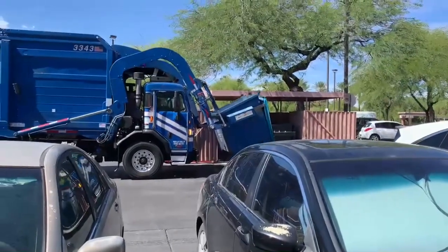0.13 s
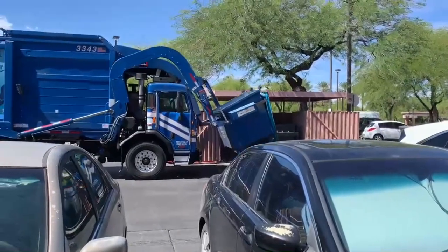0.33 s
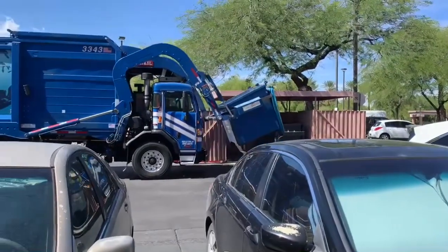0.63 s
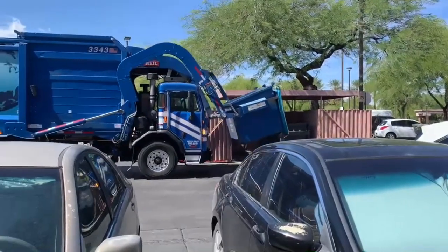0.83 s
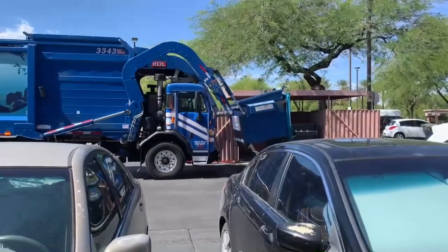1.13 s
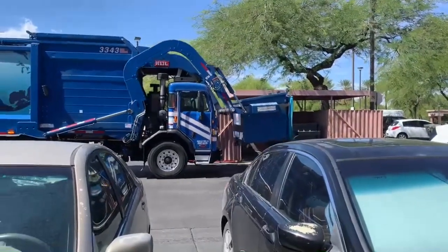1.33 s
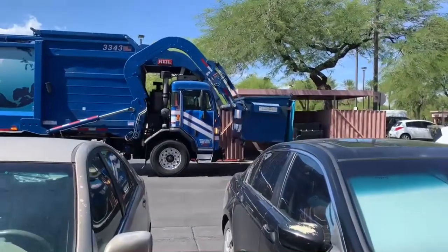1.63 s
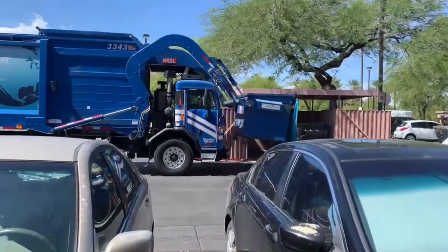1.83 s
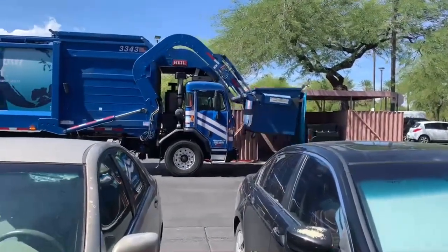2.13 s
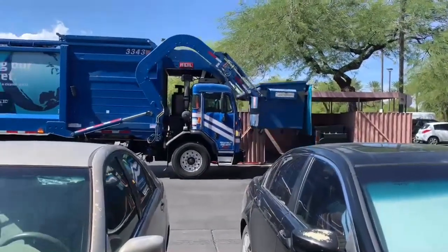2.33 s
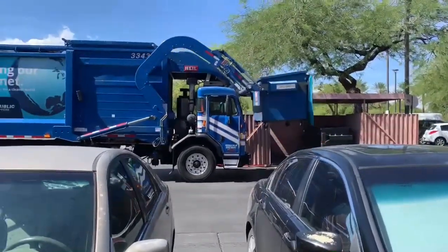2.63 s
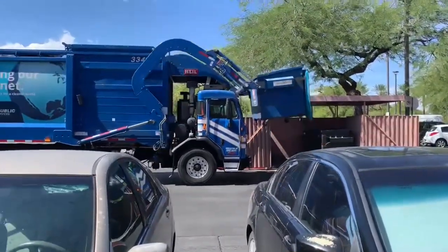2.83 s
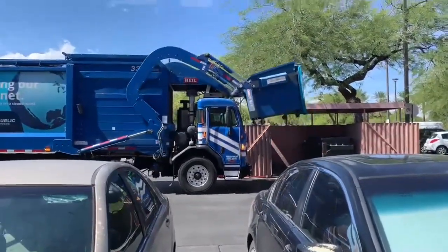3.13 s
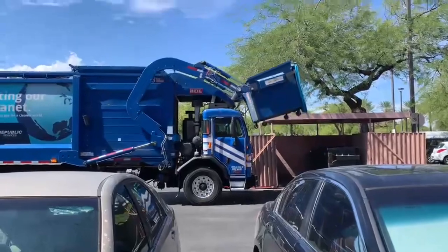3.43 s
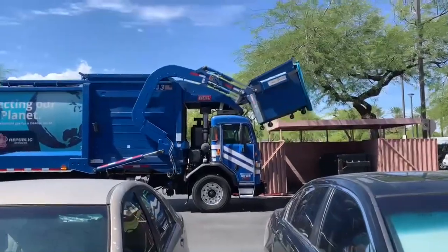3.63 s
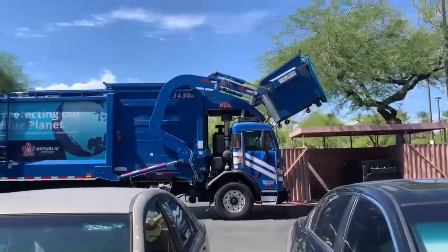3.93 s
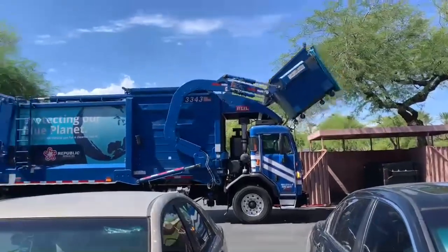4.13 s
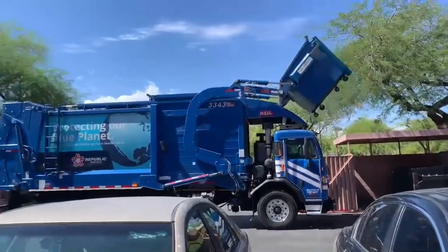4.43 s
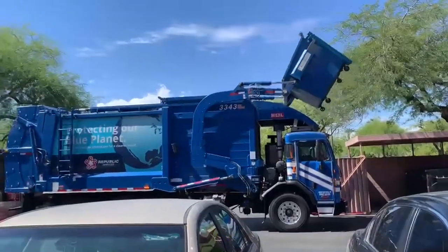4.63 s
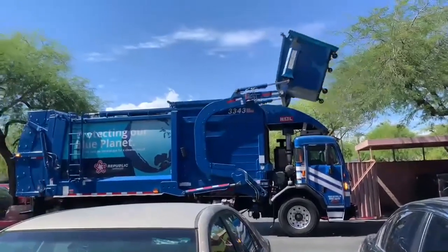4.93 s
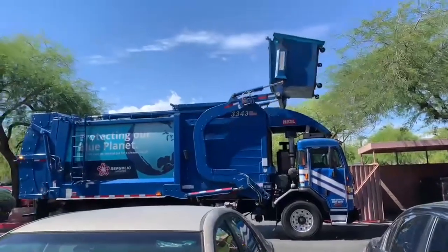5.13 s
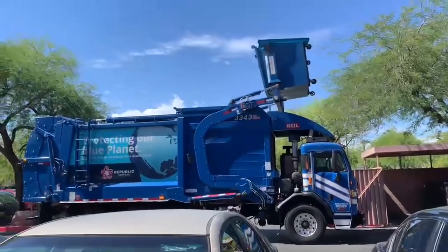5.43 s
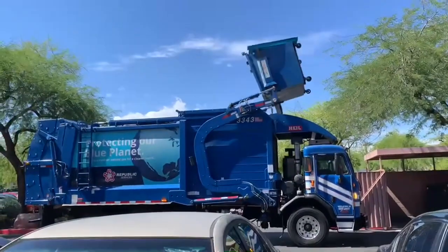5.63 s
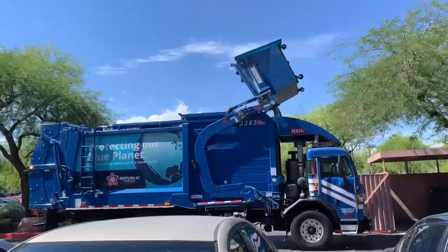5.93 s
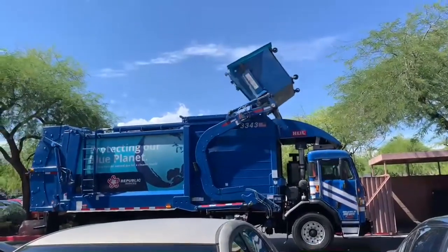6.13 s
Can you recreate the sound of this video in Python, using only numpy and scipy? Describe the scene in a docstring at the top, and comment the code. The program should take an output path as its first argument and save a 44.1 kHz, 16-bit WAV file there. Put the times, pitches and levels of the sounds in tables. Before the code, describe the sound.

Rumbling, clattering garbage truck engine with wavering pump whine and oil hiss lifts a steel bin, ending in loud booming bangs.

```python
"""A front-loading garbage truck, heard across a parking lot, hoists a steel container over its cab.
Its six-cylinder diesel revs up three times: a firing-rate drone, coloured noise and short knocks follow the crank.
The pump and gears whine as wavering tones at multiples of crank speed; oil hisses as narrow noise bands.
The pivots squeak as jittery gliding tones; the container booms, clanks, rattles and rings on the forks.
At the top its load starts to crash out in dull, damped thuds; two slightly unlike microphones take it in."""
import sys
import numpy as np
from scipy import signal
from scipy.fft import rfft, irfft
from scipy.io import wavfile
from scipy.ndimage import uniform_filter1d, map_coordinates

SR = 44100
rng = np.random.default_rng(int(sys.argv[2]) if len(sys.argv) > 2 else 0)


def inscribe(sig):
    """Save sig as 16-bit PCM at rate SR to the path in sys.argv[1].

    A 1-D sig is mono; a 2-D sig holds one channel per row.
    Samples are clipped to [-1, 1] before scaling.
    """
    pcm = np.round(np.clip(np.atleast_2d(sig).T, -1, 1) * 32767)
    wavfile.write(sys.argv[1], SR, pcm.astype(np.int16))


N = 277124
T = np.arange(N) / SR  # seconds
HZ = np.fft.rfftfreq(N, 1 / SR)


def amp(db):
    """Decibels to gain."""
    return 10 ** (np.asarray(db) / 20)


def unit(x):
    """Scales to rms 1."""
    return x / np.sqrt(np.mean(x ** 2) + 1e-20)


def curve(rows, axis=1):
    """One column of a timed table at every sample."""
    rows = np.array(rows)
    return np.interp(T, rows[:, 0], rows[:, axis])


def hump(peak_s, width_s):
    """A smooth bell in time, 1 at its peak."""
    return np.exp(-((T - peak_s) / width_s) ** 2)


def colour(points):
    """A table over frequency, joined on a log axis."""
    hz, value = np.transpose(points)
    return np.interp(np.log(HZ + 1), np.log(hz + 1), value)


def wander(hz):
    """Slow random movement of rms 1, mostly slower than hz."""
    spectrum = rfft(rng.standard_normal(N)) * np.exp(-(HZ / hz) ** 2)
    return unit(irfft(spectrum, N))


# likeness of the truck's noise at the two ears: frequency_hz, likeness (0-1)
EAR_LIKENESS = [(40, 0.93), (300, 0.89), (550, 0.74), (780, 0.27), (1150, 0.8), (1600, 0.47), (2600, 0.5),
                (3400, 0.46), (4300, 0.94), (5700, 0), (6600, 0.78), (8300, 1), (10000, 0.86), (12000, 0.6),
                (13500, 1), (16000, 1)]


def noise(spectrum):
    """Coloured noise at two ears, alike to a degree that differs by frequency."""
    same = np.clip(colour(EAR_LIKENESS), 0, 1)
    mid, side = rfft(rng.standard_normal((2, N))) * amp(colour(spectrum))
    mid = irfft(mid * np.sqrt(1 + same), N)
    side = irfft(side * np.sqrt(1 - same), N)
    return np.array([mid + side, mid - side]) / mid.std()


def fuzzy_tone(hz, width_hz):
    """A narrow band of noise around a pitch that may move."""
    angle = 2 * np.pi * np.cumsum(hz * np.ones(N)) / SR
    return unit(wander(width_hz) * np.cos(angle) + wander(width_hz) * np.sin(angle))


def reflections(x, depth_db, spacing_hz):
    """Echoes from the ground and the parked cars comb the sound; the comb shifts as the listener walks."""
    hz, t, z = signal.stft(x, SR, nperseg=2048)
    comb = rng.standard_normal(z.shape[1:])
    comb = uniform_filter1d(comb, max(1, round(spacing_hz / hz[1])), axis=0)
    comb = unit(uniform_filter1d(comb, size=30, axis=1))
    comb = comb * np.minimum(hz / 800, 1)[:, None]  # shallower in the lows
    return signal.istft(z * amp(depth_db * comb), SR, nperseg=2048)[1][:, :N]


# engine speed: start_s, speed_rpm
ENGINE_SPEED = [(0.0, 1318), (0.8, 1413), (1.25, 1436), (1.55, 1426), (2.0, 1339), (2.35, 1238),
                (2.58, 1237), (2.8, 1305), (3.7, 1429), (4.85, 1430), (5.0, 1401), (5.2, 1270),
                (5.38, 1210), (5.6, 1242), (5.97, 1416), (6.28, 1425)]


def crank():
    """The crank's speed (rpm) and the turns it has made, which pace engine, pump and gears."""
    rpm = curve(ENGINE_SPEED)
    return rpm, np.cumsum(rpm) / 60 / SR


# spectrum of the engine's clatter, also of its knocks: frequency_hz, level_db (per Hz)
CLATTER_SPECTRUM = [(400, -21), (720, -8.5), (880, -0.5), (1360, 0.8), (1560, -7.5), (1850, -5),
                    (2250, -7.8), (2620, -5.8), (3300, -13), (4200, -12.3), (5300, -19.5), (6900, -22.5),
                    (9000, -39), (12000, -59)]
KNOCK_DECAY_S, KNOCK_SPREAD_DB, KNOCK_DRIFT_S = .013, 1.3, .00016


def knocks(firing):
    """Combustion knock: at each firing a cylinder rings the block in its own way, unevenly; rms 1."""
    at = np.flatnonzero(np.diff(firing.astype(int)))
    size = amp(KNOCK_SPREAD_DB * rng.standard_normal(len(at)))
    drift = (KNOCK_DRIFT_S * SR * wander(7)[at]).astype(int)
    at = np.clip(at + drift, 0, N - 1)
    age, out = T[:SR // 25], np.zeros((2, N))
    rings = noise(CLATTER_SPECTRUM)[:, :6 * len(age)].reshape(2, 6, -1)
    rings = rings * np.exp(-age / KNOCK_DECAY_S)
    for cylinder in range(6):
        train = np.zeros((1, N))
        train[0, at[cylinder::6]] = size[cylinder::6]
        out += signal.oaconvolve(train, rings[:, cylinder], axes=1)[:, :N]
    return unit(out)


# spectrum of the engine's low roar: frequency_hz, level_db (per Hz)
ROAR_SPECTRUM = [(40, -34), (62, -1), (85, -8.5), (120, -3.5), (145, -8.5), (170, 0.5), (215, 0.5),
                 (300, -1), (400, -4), (570, -6), (660, -11.5), (760, -19.5), (1000, -17), (2000, -82)]
# clatter from further along the truck, where the ground echo no longer hollows it:
# frequency_hz, level_db (per Hz)
OPEN_CLATTER_SPECTRUM = [(400, -11), (740, -2), (960, 0.5), (1330, -1.5), (1560, -4.5), (1850, -2.5),
                         (2250, -7.5), (2620, -7), (3300, -10.5), (4200, -12.5), (5300, -18.5), (6900, -22),
                         (9000, -37), (12000, -59)]
OPEN_S, OPEN_TAKES_S = 4.02, 0.52  # when the listener gets there, and how gradually
# harder note that the engine takes on under load: frequency_hz, level_db (per Hz)
STRAIN_SPECTRUM = [(250, -18), (380, -1), (480, 0), (600, -5), (740, -9), (950, -15), (1300, -22),
                   (2000, -42)]
STRAIN_DB, STRAIN_S, STRAIN_WIDTH_S = -28.5, 4.52, 0.75
# treble hiss of the fan: frequency_hz, level_db (per Hz)
FAN_SPECTRUM = [(2000, -2.5), (5000, -9), (6500, -0.5), (8300, 1.5), (10000, 0), (11700, -4), (13500, -6.5),
                (16000, -16)]
# levels at working speed, and their growth with speed
WORKING_RPM = 1400
DRONE_DB, DRONE_DB_PER_RPM = -39.5, 0.07
ROAR_DB, ROAR_DB_PER_RPM = -21, 0.0029
CLATTER_DB, KNOCK_DB, CLATTER_DB_PER_RPM = -29, -34, 0.0081
FAN_DB, FAN_DB_PER_RPM = -40.5, 0.0088
# the heaviest part of the lift, as the arms swing the container over the cab
HEAVE_S, HEAVE_WIDTH_S = 4.295, 0.37
HEAVE_ROAR_DB, HEAVE_CLATTER_DB, HEAVE_DRONE_DB = 2.1, 1.35, 16.5
CLATTER_PEAK_S, CLATTER_WIDTH_S = 3.92, 0.47  # the clatter swells a little earlier
DRONE_WIDTH_S, DRONE_WAVER_DB, DRONE_WAVER_HZ = 0.63, 0.5, 11  # slow, uneven swell
SHADE_DB, SHADE_S = -3, 0.49  # at first the parked cars screen off some of the treble


def engine(turns, rpm):
    """Three firings a turn drive drone, roar, clatter and fan with speed; strain swells under load."""
    firing, revs = 3 * turns, rpm - WORKING_RPM

    exhaust = np.sqrt(2) * (np.sin(2 * np.pi * firing) + 0.018 * np.sin(4 * np.pi * firing))
    drone_db = DRONE_DB + DRONE_DB_PER_RPM * revs
    drone_db = drone_db + HEAVE_DRONE_DB * hump(HEAVE_S, DRONE_WIDTH_S)
    drone_db = drone_db + DRONE_WAVER_DB * wander(DRONE_WAVER_HZ)
    drone = amp(drone_db) * exhaust

    roar_db = ROAR_DB + ROAR_DB_PER_RPM * revs
    roar_db = roar_db + HEAVE_ROAR_DB * hump(HEAVE_S, HEAVE_WIDTH_S) + .5 * wander(23)
    roar = amp(roar_db) * noise(ROAR_SPECTRUM)

    # equal-power crossfade from the hollow clatter to the open one
    opening = np.pi / 4 * (1 + np.tanh((T - OPEN_S) / OPEN_TAKES_S))
    hollow = np.cos(opening) * noise(CLATTER_SPECTRUM)
    open_clatter = np.sin(opening) * noise(OPEN_CLATTER_SPECTRUM)
    metal = amp(CLATTER_DB) * (hollow + open_clatter) + amp(KNOCK_DB) * knocks(firing)
    clatter_db = CLATTER_DB_PER_RPM * revs + 0.6 * wander(13.0)
    clatter_db = clatter_db + HEAVE_CLATTER_DB * hump(CLATTER_PEAK_S, CLATTER_WIDTH_S)
    clatter = amp(clatter_db) * metal

    strain = amp(STRAIN_DB) * hump(STRAIN_S, STRAIN_WIDTH_S) * noise(STRAIN_SPECTRUM)
    fan = amp(FAN_DB + FAN_DB_PER_RPM * revs) * noise(FAN_SPECTRUM)
    treble = amp(SHADE_DB * hump(0, SHADE_S)) * (clatter + fan)
    return drone + reflections(roar + strain + treble, depth_db=2.69, spacing_hz=65)


# pressure in the lift circuit, heard as the level of the pump's whine: start_s, level_db
LIFT_PRESSURE = [(0, -34), (.08, -37), (.2, -27.5), (.52, -20), (.62, -26), (.75, -22), (.95, -29),
                 (1.07, -19), (1.22, -26.5), (1.4, -26), (1.53, -17.5), (1.74, -27.5), (1.92, -18.5),
                 (2.04, -20), (2.12, -29), (2.7, -29.5), (2.9, -23.5), (3.1, -24), (3.28, -19), (3.46, -35),
                 (3.56, -19.5), (3.69, -18.5), (3.84, -26.5), (3.93, -19.5), (4.2, -23.5), (4.7, -21),
                 (4.82, -20.5), (5.12, -22.5), (5.24, -33), (5.6, -28.5), (5.88, -25), (6.0, -22.5),
                 (6.14, -26), (6.28, -25)]
PUMP_WAVER_DB, PUMP_WAVER_HZ = 0.3, 14  # the whine wavers as the load sways
# tones of engine and pump: crank_multiple, level_db (against the pump), flutter (share)
CRANK_TONES = [(12.5, 0, .12), (12.2, -10, 1), (25.0, -21, 1), (50.6, -25, .7), (80.2, -32, 1)]
# hiss of oil rushing through the lift valve: start_s, level_db, centre_hz
OIL_HISS = [(0, -44.5, 3910), (1.0, -43, 4020), (1.8, -45, 3980), (2.5, -45.5, 3950), (3.0, -43, 3990),
            (3.5, -45.5, 4380), (4.2, -45, 4690), (4.8, -49, 4650), (5.3, -61, 4140), (6.28, -62, 4370)]
OIL_WIDTH_HZ = 340


def hydraulics(turns):
    """The pump's ripple and side tones follow the crank; oil hisses in a band of moving pitch and level."""
    out = np.zeros((2, N))
    pressure_db = curve(LIFT_PRESSURE) + PUMP_WAVER_DB * wander(PUMP_WAVER_HZ)
    for multiple, db, flutter in CRANK_TONES:
        waver = 1 + flutter * (wander(10.0) + 1j * wander(19.0))
        scatter = np.array([wander(29) + 1j * wander(9.2) for ear in range(2)])
        scatter = scatter * min(0.019 * multiple, 1)  # higher tones differ more between the ears
        tone = ((waver + scatter) * np.exp(2j * np.pi * multiple * turns)).real
        out += amp(pressure_db + db) * unit(tone)
    centre_hz = curve(OIL_HISS, axis=2)
    shared, left, right = (fuzzy_tone(centre_hz, width_hz=OIL_WIDTH_HZ) for path in range(3))
    return out + amp(curve(OIL_HISS)) * unit(shared + 1.3 * np.array([left, right]))


GEARS_DB = -23.5  # against the lift pressure


def gears(turns):
    """The mesh tone follows crank and pressure, fading differently at each ear as the echoes shift."""
    fade = np.array([1 + .7 * (wander(14) + 1j * wander(14)) for ear in range(2)])
    mesh = unit((fade * np.exp(2j * np.pi * 76.6 * turns)).real)  # 76.6 cycles a crank turn
    return amp(curve(LIFT_PRESSURE) + GEARS_DB) * mesh


# jolts to the body and the hanging container: start_s, hold_s, level_db, fade_db_per_s
BODY_JOLTS = [(0, .1, -32, 22), (.64, 0.5, -24.5, 70), (1.42, 0.09, -32, 28), (2.08, .25, -28.5, 22),
              (3.9, .4, -31.5, 12), (6.105, .07, -19.5, 70), (6.24, .1, -16.5, 30)]
# low spectrum of the shaking body: frequency_hz, level_db (per Hz)
BODY_SPECTRUM = [(15, -26), (30, -22), (42, -10), (52, 4.5), (62, -7), (90, -1), (130, -9.5), (180, -36),
                 (300, -48)]
JOLT_RISE_S, SHUDDER_REST_DB = 0.025, -36.5


def shudder():
    """Each jolt shakes the heavy body for a while, then dies away."""
    power = amp(SHUDDER_REST_DB) ** 2
    for s, hold, db, fade in BODY_JOLTS:
        rise = np.clip((T - s) / JOLT_RISE_S, 0, 1)
        power = power + (rise * amp(db - fade * np.maximum(T - s - hold, 0))) ** 2
    return np.sqrt(power) * noise(BODY_SPECTRUM)


# squeaks of the arm pivots:
# start_s, length_s, pitch_hz, fundamental_db, octave_db, jitter (rms share of pitch)
PIVOT_SQUEAKS = [(.62, .17, 2700, -39, -39, .12), (.671, .009, 5300, -30, -37, .01),
                 (2.097, .026, 2570, -28, -40, .01), (2.12, .14, 2660, -52, -45, .05),
                 (2.31, .045, 2720, -44, -38, .07), (2.369, .026, 5300, -41, -33, .06),
                 (2.38, .035, 2600, -46, -42, .025), (3.15, .09, 3600, -55, -47, .06),
                 (3.29, .08, 4100, -55, -47, .06), (5.87, .035, 4000, -52, -41, .04),
                 (6.16, .09, 2640, -39, -34, .03)]


def pivots():
    """Dry pins slip in short, rough squeaks with a strong octave."""
    out = np.zeros((2, N))
    for s, length, hz, first_db, octave_db, jitter in PIVOT_SQUEAKS:
        near = (T > s) & (T < s + length)
        age = T[near] - s
        slip = unit(uniform_filter1d(rng.standard_normal((2, len(age))), size=60))
        angle = 2 * np.pi * np.cumsum(hz * (1 + jitter * slip), axis=1) / SR
        tone = amp(first_db) * np.sin(angle) + amp(octave_db) * np.sin(2 * angle)
        out[:, near] += np.sin(np.pi * age / length) * tone
    return out


# ringing of loose steel lids and hinges: pitch_hz, level_db (relative), t60_s
LOOSE_HINGES = [(1370, -11, .1), (1940, -12, 0.087), (2580, -2, 0.08), (4360, 0, 0.065), (5230, 1, 0.059),
                (5830, -10, .08), (6480, -3, 0.054), (7100, -2, 0.05), (10100, -4, 0.032),
                (11200, 1.5, 0.027)]


def rattle(per_s, spread_db):
    """A shower of small, uneven taps, each ringing one mode of the loose hardware; rms 1."""
    out, age = np.zeros((2, N)), T[:SR // 8]
    for hz, db, t60 in LOOSE_HINGES:
        struck = rng.random(N) < per_s / SR
        taps = struck * amp(spread_db * np.minimum(rng.exponential(1, N), 3))
        ring = amp(db - 60 * age / t60) * np.sin(2 * np.pi * (hz * age + rng.random((2, 1))))
        out += signal.oaconvolve(taps[None], ring, axes=1)[:, :N]
    return unit(out)


# blows on the container, levels and decays before the trims in the function:
# start_s, boom_db, clank_db, rattle_db (loose hardware), decay_s
CONTAINER_BLOWS = [(0.672, -21, -45, -32, 0.13), (.69, -32, -38, -39, .2), (0.715, -24, -24.5, -46, 0.18),
                   (0.741, -29, -36, -45, 0.19), (2.318, -37, -42, -38, .14), (2.373, -30, -29, -36, 0.15),
                   (3.946, -44, -40, -33, .1), (6.102, -12, -18, -26.5, 0.2),
                   (6.129, -17.5, -30, -36, 0.68), (6.145, -15.5, -40, -44, 0.43),
                   (6.18, -15.5, -33, -35, 0.19), (6.204, -23, -26, -42, 0.19), (6.231, -23, -35, -41, .2),
                   (6.26, -16, -40, -39, 0.35)]
# ringing of the container's panels: pitch_hz, level_db (relative), t60_s
PANEL_RINGS = [(65.7, -19, 0.43), (230, -22, .4), (273, -12, 0.15), (339, -11, 0.45), (408, -1, 0.92),
               (508, 8, 0.33), (573, -8, 0.27), (594, -10, 0.75), (670, -15, 0.73), (862, -3, 0.49),
               (914, -20, 0.38), (1080, -16, 0.33), (1970, -8, 0.26)]
# boom of the steel walls: frequency_hz, level_db (per Hz)
BOOM_SPECTRUM = [(40, -25), (70, -17), (130, 3), (230, 1.5), (380, 10.5), (460, -5.5), (620, 0), (900, -9),
                 (1400, -26), (2600, -21), (4200, -26.5), (6800, -25), (11000, -66), (16000, -48)]
# steel edges striking: frequency_hz, level_db (per Hz)
EDGE_SPECTRUM = [(400, -18), (900, 5.5), (1400, -4), (2000, 1), (3000, -12), (4300, -7), (7000, -19),
                 (11000, -29), (16000, -36)]
# scrape and grit in a rattle: frequency_hz, level_db (per Hz)
GRIT_SPECTRUM = [(1500, -20), (4000, -13), (5400, 0), (7500, 5), (11000, 0), (12500, -7), (16000, -20)]
CLINK_DB = -10  # first clink of the hinges at a blow, against the rattle that follows


def container():
    """Each blow clanks at the edges and rattles the lids, then the boom builds in the ringing panels."""
    boom, clank, loose, ring = np.zeros((4, N))  # the first three add up as power
    for s, boom_db, clank_db, rattle_db, decay_s in CONTAINER_BLOWS:
        age = np.maximum(T - s, 0)
        swell = 1 - np.exp(-(age / 0.002) ** 2)
        strike = amp(-60 * age / (1.45 * decay_s)) * (1 - np.exp(-age / 0.0011))
        boom += (amp(boom_db + 2.0 - 60 * age / (1.35 * decay_s)) * swell) ** 2
        clank += (amp(clank_db) * strike) ** 2
        loose += (amp(rattle_db) * strike) ** 2
        near = (age > 0) & (age < 1)
        since = age[near]
        for hz, db, t60 in PANEL_RINGS:
            angle = 2 * np.pi * (hz * since + rng.random())
            ring[near] += amp(boom_db + db - 11.5 - 60 * since / t60) * swell[near] * np.sin(angle)
        for hz, db, t60 in LOOSE_HINGES:
            angle = 2 * np.pi * (hz * rng.uniform(.97, 1.03) * since + rng.random())
            ring[near] += amp(rattle_db + db + CLINK_DB - 60 * since / t60) * np.sin(angle)
    hardware = .7 * noise(GRIT_SPECTRUM) + .7 * rattle(per_s=140, spread_db=3)
    walls = np.sqrt(boom) * noise(BOOM_SPECTRUM)
    edges = np.sqrt(clank) * noise(EDGE_SPECTRUM)
    return walls + edges + np.sqrt(loose) * hardware + ring


# heavy pieces of the load dropping against the container's wall: start_s, pitch_hz, level_db
LOAD_THUDS = [(6.008, 260, -13), (6.05, 290, -17), (6.11, 270, -7), (6.143, 310, -13), (6.18, 240, -10.5),
              (6.26, 280, -9)]
THUD_PEAK_S = .007  # time that the wall takes to swing out fully


def thuds():
    """The wall swings out under each piece and is damped at once by the load behind it."""
    out = np.zeros(N)
    for s, hz, db in LOAD_THUDS:
        age = np.maximum(T - s, 0)
        swing = age / THUD_PEAK_S * np.exp(1 - age / THUD_PEAK_S)
        out += amp(db) * swing * np.sin(2 * np.pi * hz * age)
    return out


# bearing of the truck as the listener turns: start_s, left_ear_lead (samples)
TRUCK_BEARING = [(0, 3), (1.2, 3.5), (2.2, 2.5), (3.2, 2), (3.8, 1), (4.4, -1.5), (5.2, -2), (6.28, -2)]


def scene():
    """The whole truck drifts from a little left to a little right; only lows and mids carry its bearing."""
    rpm, turns = crank()
    truck = engine(turns, rpm) + hydraulics(turns) + gears(turns)
    truck = truck + shudder() + pivots() + container() + thuds()
    low = irfft(rfft(truck) * colour([(5400, 1), (6000, 0)]), N)
    at, half_lead = np.arange(N), curve(TRUCK_BEARING) / 2
    turned = [map_coordinates(ear, [at + sign * half_lead], order=5, mode="mirror")
              for ear, sign in zip(low, (1, -1))]
    return truck - low + np.array(turned)


EDGE_HZ = 15800  # upper band limit


def record(dry):
    """Two slightly unlike microphones, soft overload on the loudest peaks, and a steep band limit."""
    # left against right: frequency_hz, level_db
    balance_db = colour([(30, -4.0), (70, -3.0), (140, 1.5), (290, -2.0), (550, 1.0),
                         (1100, 0.3), (2200, 1.1), (4400, -2.5), (8000, -0.5)])
    # the two ports part in phase in the treble: frequency_hz, phase (radians)
    skew = colour([(6400, 0), (7200, -1.2), (8000, -2.9), (9000, -3.4), (10500, -6.1),
                   (11700, -6.5), (12700, -9), (14200, -9.7), (15000, -12.5)])
    mismatch = amp(balance_db / 2) * np.exp(.5j * skew)
    heard = irfft(rfft(dry) * np.array([mismatch, 1 / mismatch]), N)
    heard = heard / (1 + (heard / .95) ** 8) ** (1 / 8)
    band = signal.firwin(511, EDGE_HZ, window=("kaiser", 9), fs=SR)
    return signal.oaconvolve(heard, band[None], "same")


dry = scene()
out = record(dry)
inscribe(out)
```